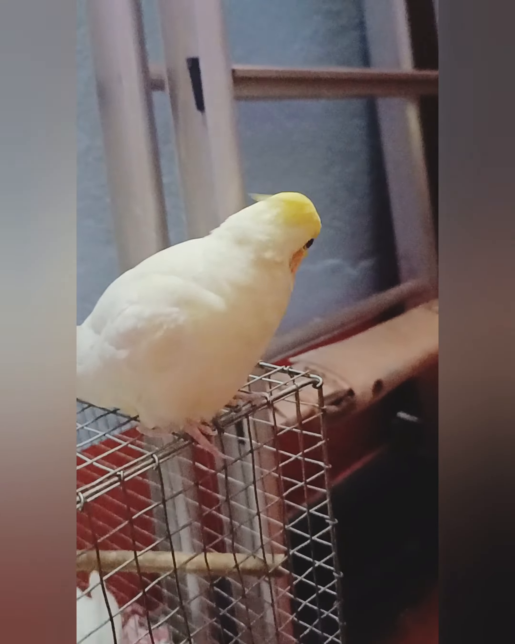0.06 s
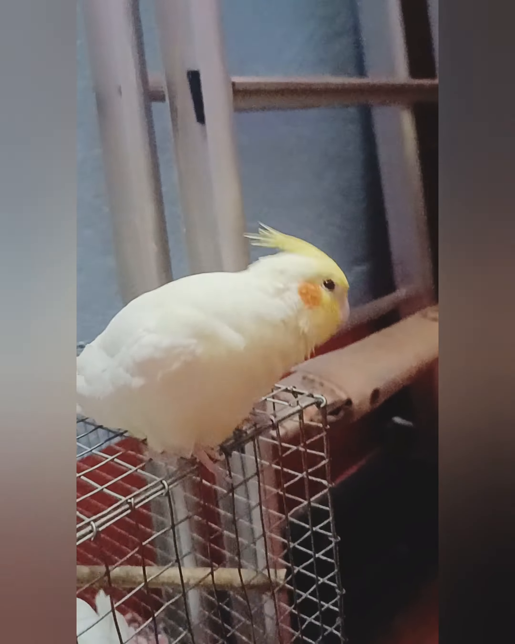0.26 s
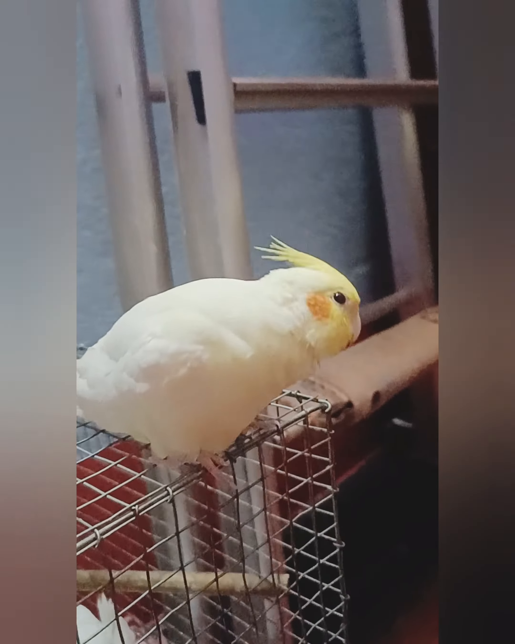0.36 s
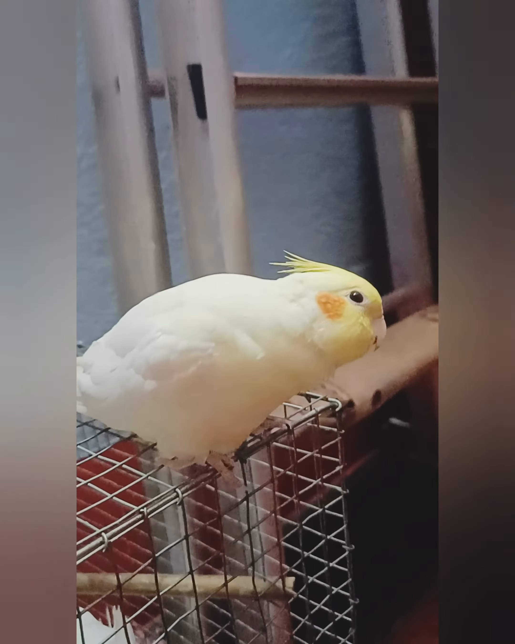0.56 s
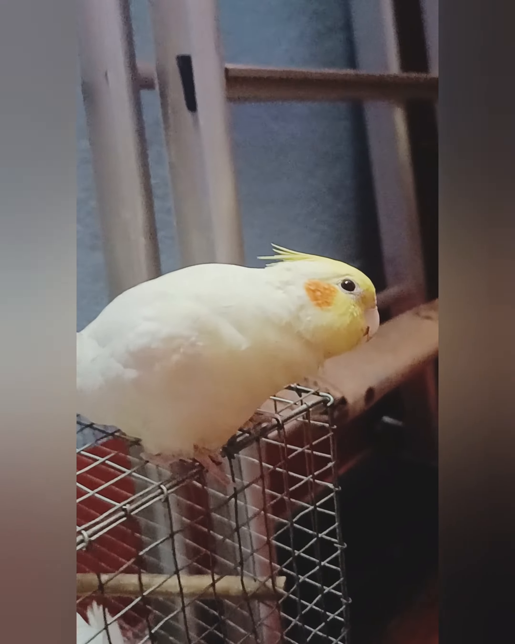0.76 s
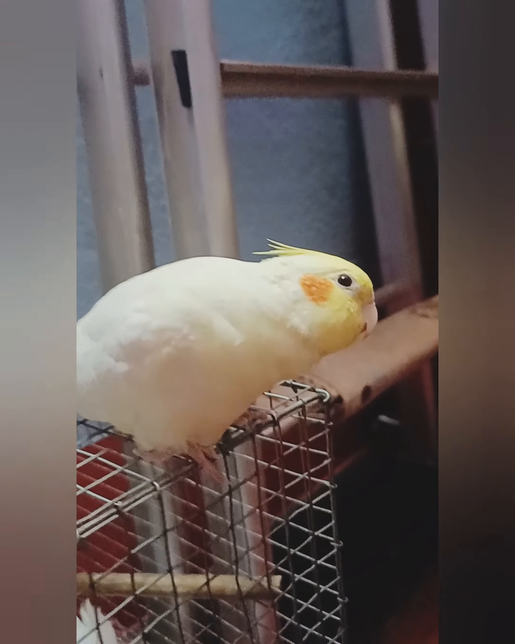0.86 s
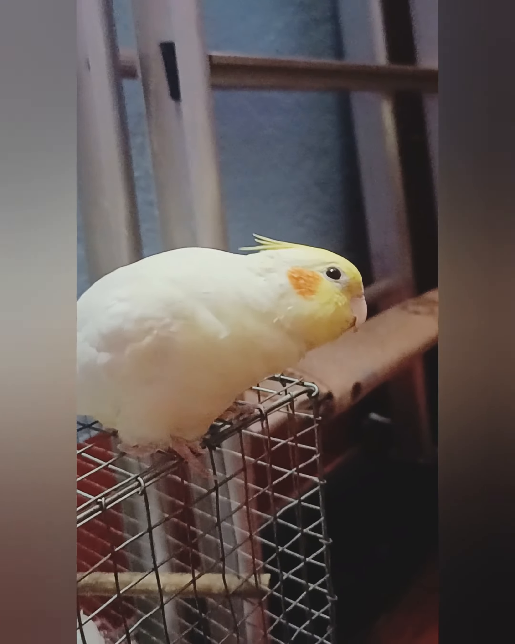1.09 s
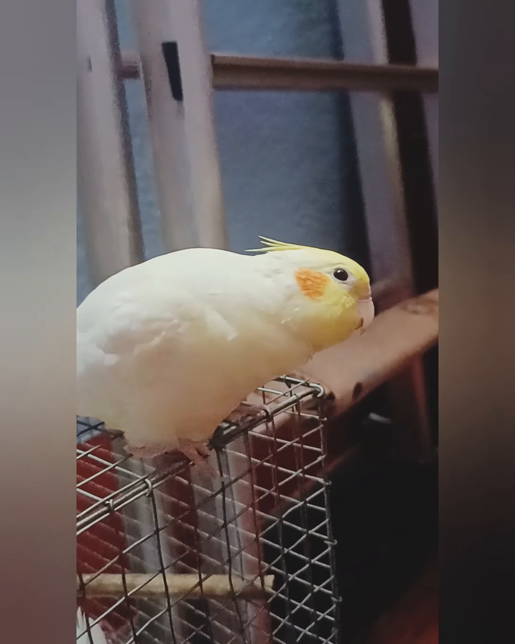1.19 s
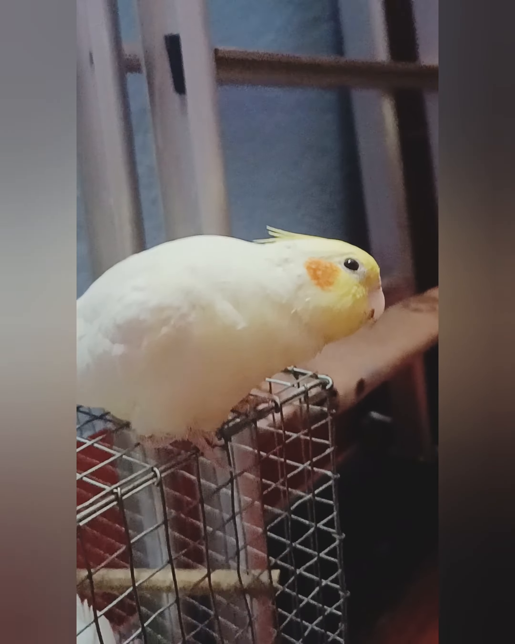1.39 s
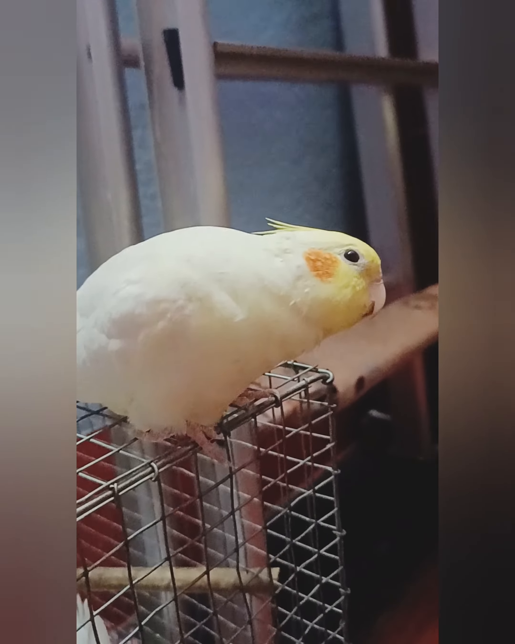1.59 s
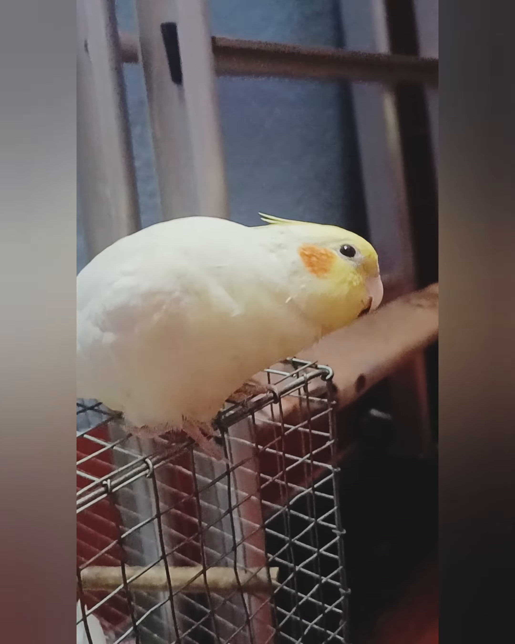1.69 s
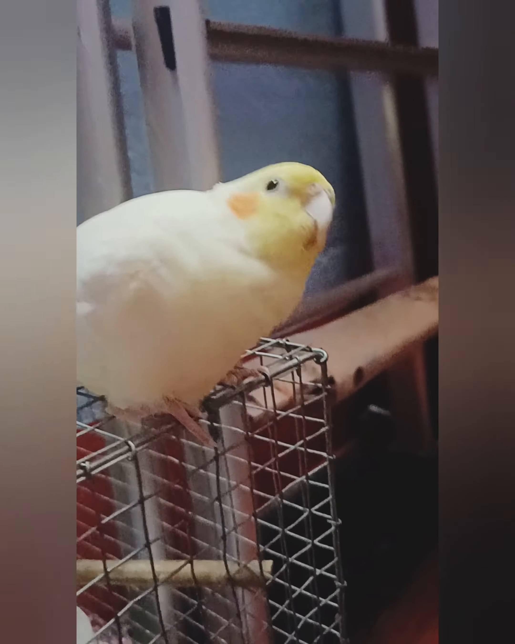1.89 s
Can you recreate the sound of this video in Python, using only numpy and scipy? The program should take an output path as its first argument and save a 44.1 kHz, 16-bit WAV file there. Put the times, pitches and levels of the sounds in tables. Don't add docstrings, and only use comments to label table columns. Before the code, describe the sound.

Pet parrot chirps: a faint rasp, a wavering whistle, a tiny tock, then three hoarse puffs indoors

```python
import sys
import numpy as np
from scipy import signal
from scipy.fft import rfft, irfft
from scipy.io import wavfile
from scipy.ndimage import uniform_filter1d

SR = 44100
rng = np.random.default_rng(int(sys.argv[2]) if len(sys.argv) > 2 else 0)


def gain_from_db(level_db):
    decades = np.asarray(level_db, float) / 20
    return 10 ** decades


def unload_wav(signal):
    wavfile.write(
        sys.argv[1],
        SR,
        np.round(np.clip(np.atleast_2d(signal).T, -1, 1) * 32767).astype(np.int16),
    )


N = 83790
T = np.arange(N) / SR
SIDES = np.array([[1], [-1]]) / 2

# frequency in Hz, level in dB per Hz.
HUM_COLOUR = [(20, -27.5), (110, -5.5), (500, -1), (1000, -6.5), (2500, -20), (4000, -37.5), (8000, -60.5),
              (16000, -44)]
# frequency in Hz, width in Hz, level in dB.
ROOM_TONES = [(54.3, 29, -74.5), (124.4, 3.9, -84), (223, 6.2, -91), (351.3, 34, -81), (5100, 300, -101),
              (6840, 550, -101), (16100, 400, -104)]
# frequency in Hz, likeness from 0 to 1.
HUM_LIKENESS = [(70, 1), (160, 0.65), (390, 0.8), (1010, 0.25), (2600, 0.1)]
# start in seconds, end in seconds, first gain in dB, last gain in dB.
HUM_SWELLS = [
    (0.152, 0.23, 5, 6.5),
    (0.232, 0.583, 7.5, 13),
    (0.583, 0.694, 11.5, 4.5),
    (0.885, 0.985, 5, 3),
    (1.13, 1.214, 6.5, -5.5),
    (1.374, 1.424, 4.5, 3),
    (1.748, 1.826, 5.5, 7),
]
# start in seconds, attack in seconds, hold in seconds, level in dB,
# attack of the bright part in seconds.
RASP_PUFFS = [
    (0.162, 0.0028, 0.051, -61.5, .002),
    (1.11, 0.0064, 0.029, -58, 0.031),
    (1.353, 0.0022, 0.024, -69, 0.031),
    (1.7298, 0.0071, 0.038, -48, 0.0028),
]
# resonance in Hz, width in Hz, level in dB.
RASP_THROATS = [
    [(1700, 240, -3.5), (2620, 320, -2), (3400, 540, -7), (4840, 500, -15.5), (8300, 2000, -23)],
    [(1200, 560, 0.5), (2890, 530, -0.5), (4000, 1700, -10.5), (5900, 1700, -23), (7730, 970, -29)],
    [(1820, 370, 2), (2810, 300, 4.5), (4200, 980, -13), (5300, 930, -40), (8000, 900, -39)],
    [(1600, 760, -0.5), (3090, 780, -3), (4020, 1150, -5.5), (5660, 890, -8), (8340, 880, -20.5)],
]
# time in seconds, settled pitch in Hz, level in dB, level left minus right in dB.
LOW_VOICE = [
    (.208, 1101, -56.5, 8),
    (.255, 1100, -38, -3),
    (.3, 1133, -36.5, -5.5),
    (.33, 1175, -37.5, 0),
    (.364, 1185, -38, -2),
    (.372, 1235, -37, 2),
    (.435, 1206, -39.5, 1.5),
    (.5, 1199, -36.5, -0.5),
    (.556, 1158, -30.5, -2),
]
# time in seconds, settled pitch in Hz, level in dB, coupling of the two voices in dB.
HIGH_VOICE = [
    (.212, 1700, -64, -1.5),
    (.232, 1688, -51.5, -7),
    (.34, 1640, -59, -20.5),
    (.39, 1682, -50.5, -9),
    (.44, 1640, -51, -7.5),
    (.475, 1678, -42.5, -8.5),
    (.503, 1691, -47.5, -6),
    (.51, 1795, -52.5, -15),
    (.548, 1723, -51.5, -12.5),
]
# time in seconds, pitch in Hz, level in dB, coupling in dB.
HIGH_SLIPS = [
    (0.546, 1600, -50.5, -6.5),
    (0.562, 1522, -53, -5.5),
]
# time in seconds, length in seconds, gain in dB.
LOW_CATCHES = [
    (0.224, 0.0026, 6),
    (0.228, 0.0033, -6.5),
    (0.289, 0.0051, -2),
    (.316, 0.004, 0.5),
    (0.382, .004, -3),
    (0.444, 0.0076, 3.5),
    (0.536, 0.01, 1),
    (0.369, 0.0019, -9.5),
    (0.4, 0.007, -8),
    (0.456, 0.0029, -9.5),
]
# time in seconds, length in seconds, extra breath in dB.
HOARSE_MOMENTS = [
    (0.213, 0.0056, 27.5),
    (0.225, 0.01, 21),
    (0.502, 0.017, 12),
    (0.563, 0.0066, 2),
]
# start in seconds, peak in dB, pitch in Hz, width in Hz.
BEAK_TICKS = [(.408, -60, 8800, 1480), (.413, -61, 6730, 1450), (0.4133, -64, 12000, 2410),
              (0.43, -55.5, 8300, 1200), (.4285, -68, 12260, 3000), (0.429, -50, 3400, 2200),
              (.485, -56.5, 9500, 5000), (.494, -62, 9000, 2000), (.509, -63, 8530, 1000),
              (.516, -69, 8700, 1000), (.528, -55, 8800, 1200), (0.53, -71.5, 13000, 2516)]
# resonance in Hz, width in Hz, level in dB.
TOCK_THROAT = [(1337, 470, -4.5), (2136, 510, -2), (3000, 500, -0.5), (4600, 400, -14.5), (5550, 350, -19),
               (7680, 1300, -21.5), (8970, 480, -14.5)]
# frequency in Hz, lead of the left in radians, level left minus right in dB.
PORT_RESPONSE = [(250, 0.14, -1.5), (596, 2.2, 1), (1200, 1.54, 4.5), (1600, 0.26, 4.5), (2520, 1.31, -2.5),
                 (5000, 4.6, -3.5), (9000, 7.8, 2), (13000, 11, -2.5)]

WHISTLE_END_S = 0.5769


def rms_one(x):
    return x / np.sqrt(np.mean(x ** 2) + 1e-20)


def in_time(rows):
    s, *columns = np.transpose(rows)
    return [np.interp(T, s, column) for column in columns]


def drift(rate_hz):
    r = np.exp(-2 * np.pi * rate_hz / SR)
    wander = signal.lfilter([1], [1, -2 * r, r * r], rng.standard_normal(2 * N))
    return rms_one(wander[N:])


def resonate(x, hz, width_hz):
    r = np.exp(-np.pi * width_hz / SR)
    top = [(1 - r * r) / 2, 0, (r * r - 1) / 2]
    bottom = [1, -2 * r * np.cos(2 * np.pi * hz / SR), r * r]
    return signal.lfilter(top, bottom, x + 1e-18)


def throat(x, peaks):
    out = 0
    for k, (hz, width, db) in enumerate(peaks):
        steep = resonate(resonate(x, hz, width), hz, 2 * width)
        out = out + gain_from_db(db) * (-1) ** k * rms_one(steep)
    return rms_one(out)


def shape(start, attack, hold, release):
    rise = np.clip((T - start) / attack, 0, 1)
    return rise * np.exp(-np.maximum(T - start - attack - hold, 0) / release)


def hum():
    level_db, right_lag_s = -69, 0.00016
    hz = np.maximum(np.arange(N // 2 + 1) * SR / N, 10)

    def on_log(points):
        point_hz, value = np.transpose(points)
        return np.interp(np.log(hz), np.log(point_hz), value)

    white = rng.standard_normal((2, N))
    air = irfft(rfft(white) * gain_from_db(on_log(HUM_COLOUR)), N)
    air = gain_from_db(level_db) * air / air.std()
    for f, width, db in ROOM_TONES:
        unsteady_db = 1.5 * np.log10(f / 50) * drift(14.0)
        air = air + gain_from_db(db + unsteady_db) * rms_one(resonate(white, f, width))
    mid, side = rfft(air)
    alike = np.clip(on_log(HUM_LIKENESS), 0, 1)
    spread = np.sqrt(1 + alike) * mid + np.sqrt(1 - alike) * side * 2 * SIDES
    lag = np.exp(2j * np.pi * hz * right_lag_s * SIDES)
    return irfft(spread * lag, N) / np.sqrt(2)


def suppressor_db():
    db = 0
    for start, end, first_db, last_db in HUM_SWELLS:
        db = db + ((T > start) & (T < end)) * np.interp(T, [start, end], [first_db, last_db])
    return uniform_filter1d(db, size=int(0.0084 * SR))


def swelling_hum():
    air, let_go_db = hum(), suppressor_db()
    low = signal.filtfilt(*signal.butter(1, 6000, fs=SR), air)
    return gain_from_db(let_go_db) * low + gain_from_db(0.86 * let_go_db) * (air - low)


def rasps():
    pulse_hz, air_share, release_s, sag_db_per_s = 410.8, 1.1, 0.0084, 110
    out = 0
    for (s, attack, hold, db, bright_attack), peaks in zip(RASP_PUFFS, RASP_THROATS):
        cycle = np.cumsum(pulse_hz * gain_from_db(2.5 * drift(90))) / SR
        pulses = np.diff(np.floor(cycle), prepend=0) * gain_from_db(2.5 * rng.standard_normal(N))
        voiced = throat(rms_one(pulses) + air_share * rng.standard_normal(N), peaks)
        dull = signal.filtfilt(*signal.butter(2, 3600, fs=SR), voiced)
        voiced = dull + (voiced - dull) * np.clip((T - s) / bright_attack, 0, 1)
        level_db = db + 1.0 * drift(40) - sag_db_per_s * np.maximum(T - s, 0)
        out = out + gain_from_db(level_db) * shape(s, attack, hold, release_s) * voiced
    return out


def whistle():
    low_hz, low_db, _ = in_time(LOW_VOICE)
    high_hz, high_db, couple_db = in_time(HIGH_VOICE)
    for s, length, db in LOW_CATCHES:
        low_db = low_db + db * np.exp(-((T - s) / length) ** 2)
    for s, *now in HIGH_SLIPS:
        high_hz, high_db, couple_db = np.where(T > s, np.array(now)[:, None], [high_hz, high_db, couple_db])

    since = np.maximum(T - LOW_VOICE[0][0], 0)
    swoop = np.exp(-(since / 0.022) ** 1.481)
    rough = 1 + 7 * swoop
    low_hz = low_hz + 980 * swoop + 9 * rough * drift(52)
    high_hz = high_hz + 949.3 * np.exp(-(since / 0.028) ** 3.2) + 19 * rough * drift(51.1)
    a = 2 * np.pi * np.cumsum(low_hz) / SR
    b = 2 * np.pi * np.cumsum(high_hz) / SR

    onset_break_db = 5.5
    octave = gain_from_db(np.interp(T, [0.44, 0.5], [-32.5, -28]) + 2.5 * drift(25))
    low_level = gain_from_db(low_db + 1.18 * drift(32) + onset_break_db * swoop * drift(130))
    low = low_level * (np.sin(a) + octave * np.sin(2 * a) + gain_from_db(-42) * np.sin(3 * a))
    mixed = gain_from_db(couple_db) * np.sin(3 * a - b) + gain_from_db(-21) * np.sin(a + b) + gain_from_db(-14.5) * np.sin(2 * a - b)
    high_level = gain_from_db(high_db + 3.2 * drift(60) + onset_break_db * np.sqrt(swoop) * drift(150))
    high = high_level * (np.sin(b) + mixed)

    air = throat(rng.standard_normal(N), [(1340, 250, -1), (1730, 450, 0.5), (2514, 1900, -19.0),
                                          (5070, 2200, -34), (8800, 1200, -25.0), (13100, 2000, -37.0)])
    hoarse_air = throat(rng.standard_normal(N), [(1720, 240, 8.0), (2120, 67, -5.5), (3070, 870, -12.5)])
    hoarse = sum(gain_from_db(db) * np.exp(-((T - s) / length) ** 2) for s, length, db in HOARSE_MOMENTS)
    breath = gain_from_db(low_db - 23.5) * (air + hoarse * hoarse_air)

    fade_in = np.clip(since / 0.0011, 0, 1)
    fade_out = np.clip(1 - (T - WHISTLE_END_S) / 0.013, 0, 1)
    return (np.sqrt(2) * (low + high) + breath) * fade_in * fade_out


def beak():
    out = 0
    for s, db, hz, width in BEAK_TICKS:
        crackle = shape(s, 0.00066, 0.00089, 0.0006) * rng.standard_normal(N)
        tick = resonate(crackle, hz, width)
        out = out + gain_from_db(db) * tick / np.abs(tick).max()
    return out


def faint_lingering_tone():
    level = gain_from_db(-58 - 4 * SIDES + 1.5 * drift(35))
    note = np.sin(2 * np.pi * 1160 * T + 2 * SIDES)
    return level * note * shape(WHISTLE_END_S, 0.011, 0.079, 0.0058)


def tock():
    start_s, hold_s, level_db = 0.8685, 0.01, -36
    along = np.clip((T - start_s) / hold_s, 0, 1)
    hz = 1520 + (1632 - 1520) * along
    throb = 1 - 0.25 * np.cos(2 * np.pi * 223 * (T - start_s)) - 0.4 * along
    note = np.sin(2 * np.pi * np.cumsum(hz) / SR) * throb
    air = gain_from_db(-8) * throat(rng.standard_normal(N), TOCK_THROAT)
    return gain_from_db(level_db) * shape(start_s, 0.0025, hold_s, 0.0035) * (np.sqrt(2) * note + air)


def room(x):
    t60_s, first_echo_s, wall_cut_hz = 0.17, 0.0042, 12000
    since = np.arange(SR // 2) / SR
    wash = rng.standard_normal((2, SR // 2)) * gain_from_db(-60 * since / t60_s)
    wash = wash * np.clip((since - first_echo_s) / first_echo_s, 0, 1)
    wash = signal.lfilter(*signal.butter(1, wall_cut_hz, fs=SR), wash)
    return signal.fftconvolve(x[None], wash / np.sqrt(np.sum(wash ** 2) / 2))[:, :N]


def ports(x):
    hz, lead, db = np.transpose(PORT_RESPONSE)
    at = np.log(np.maximum(np.arange(N // 2 + 1) * SR / N, 10))
    level = gain_from_db(SIDES * np.interp(at, np.log(hz), db))
    phase = np.exp(1j * SIDES * np.interp(at, np.log(hz), lead))
    return irfft(rfft(x) * level * phase, N)


def scene():
    song = whistle()
    bird_band = signal.butter(6, [890, 8980], "band", fs=SR, output="sos")
    short = signal.sosfilt(bird_band, rasps() + tock())
    swaying_song = song * gain_from_db(in_time(LOW_VOICE)[2] * SIDES)
    near = ports(swaying_song + short + beak())
    tail_cut = gain_from_db(-29 * np.clip((T - 1) / 0.0095, 0, 1))
    song_tail = (gain_from_db(-27) * room(song) + faint_lingering_tone()) * tail_cut
    return near + song_tail + gain_from_db(-9) * room(short) + swelling_hum()


def low_pass(x):
    return signal.sosfilt(signal.butter(12, 15720, fs=SR, output="sos"), x)


def record(dry):
    return low_pass(dry)


dry = scene()
out = record(dry)
unload_wav(out)
```